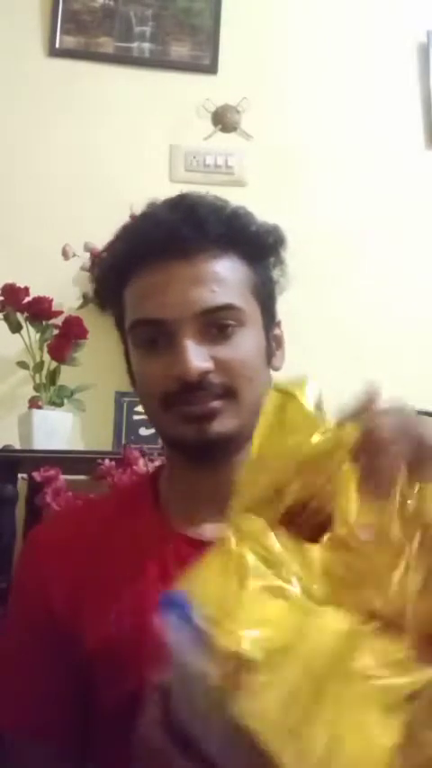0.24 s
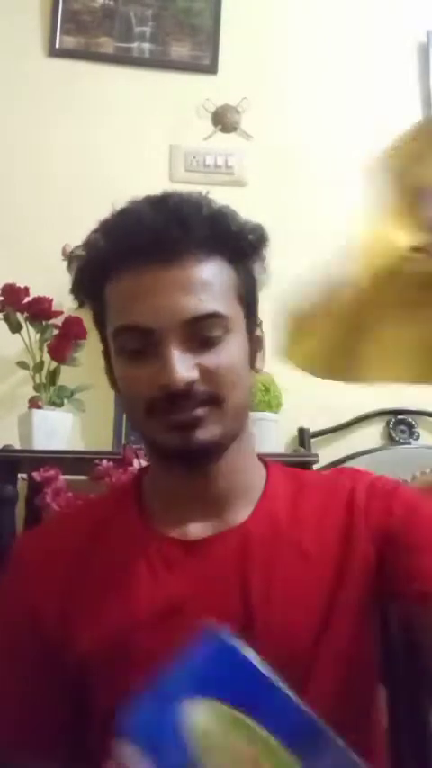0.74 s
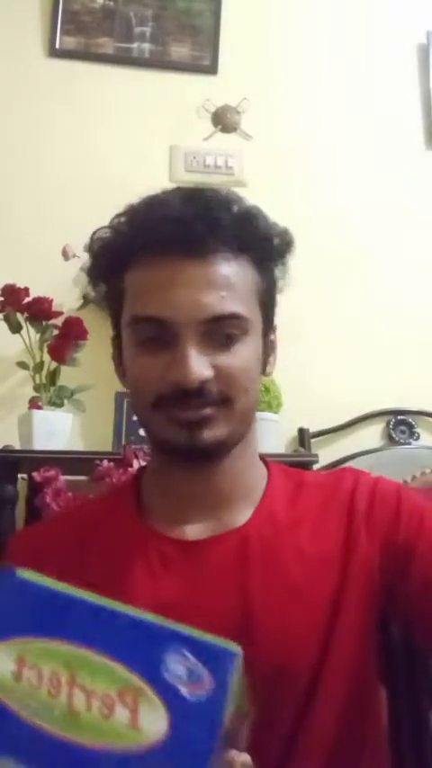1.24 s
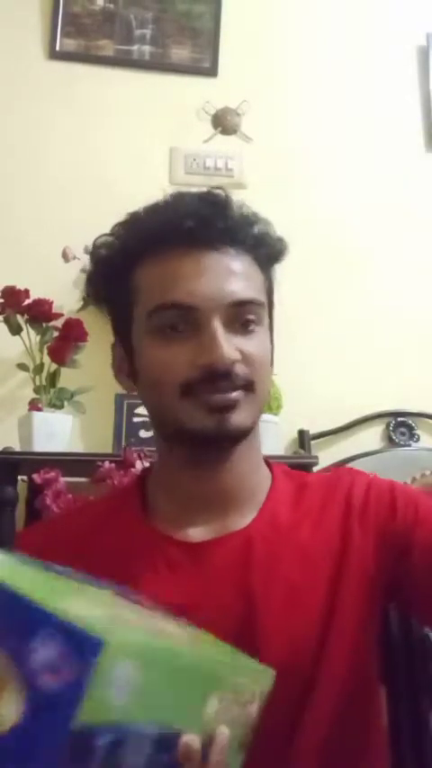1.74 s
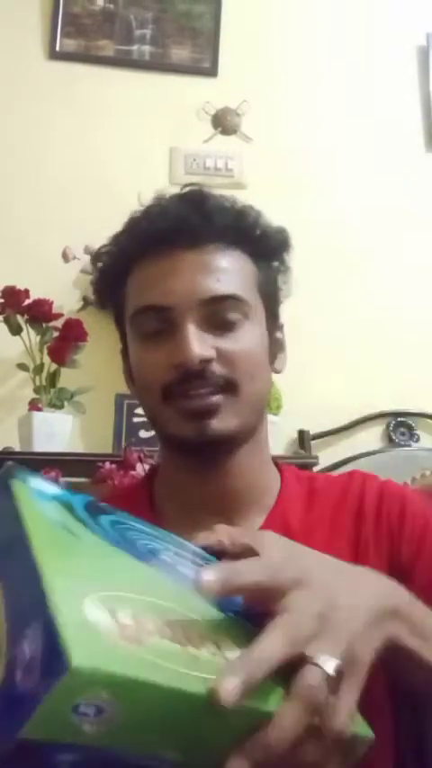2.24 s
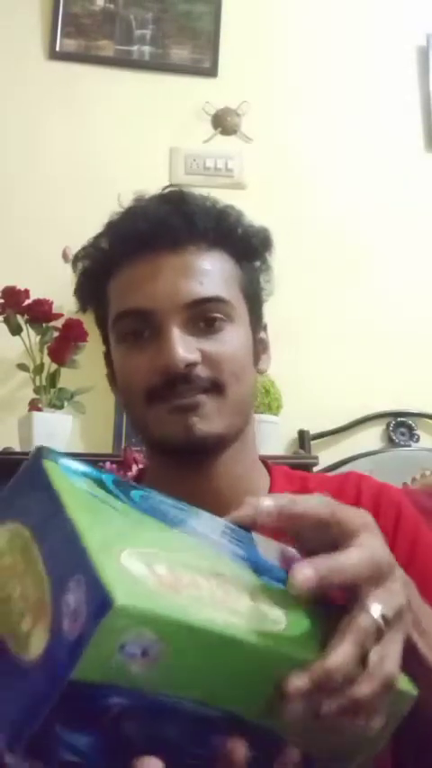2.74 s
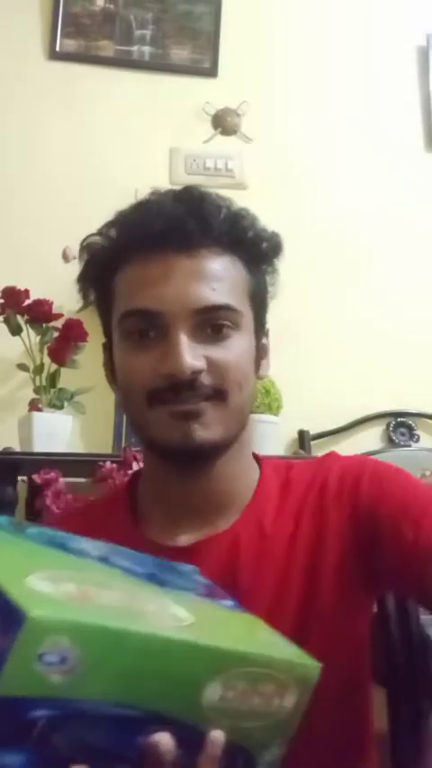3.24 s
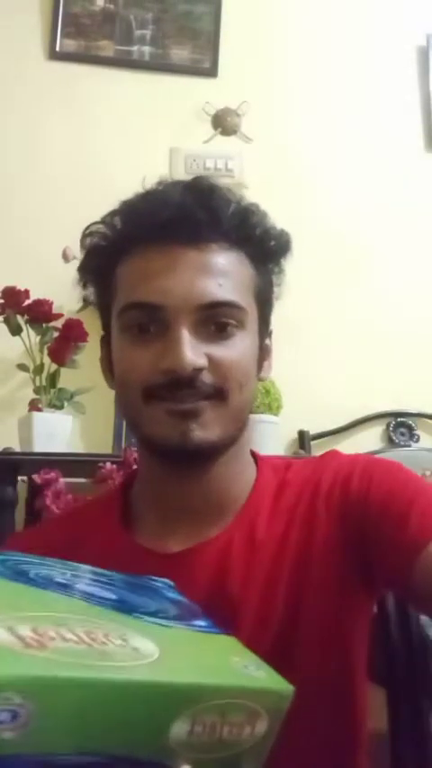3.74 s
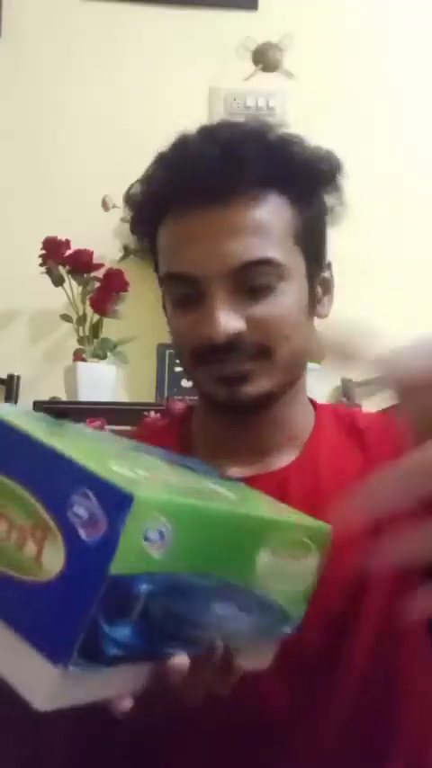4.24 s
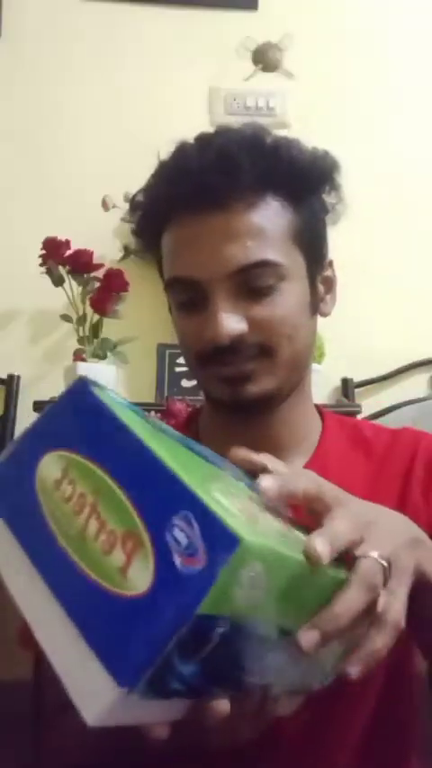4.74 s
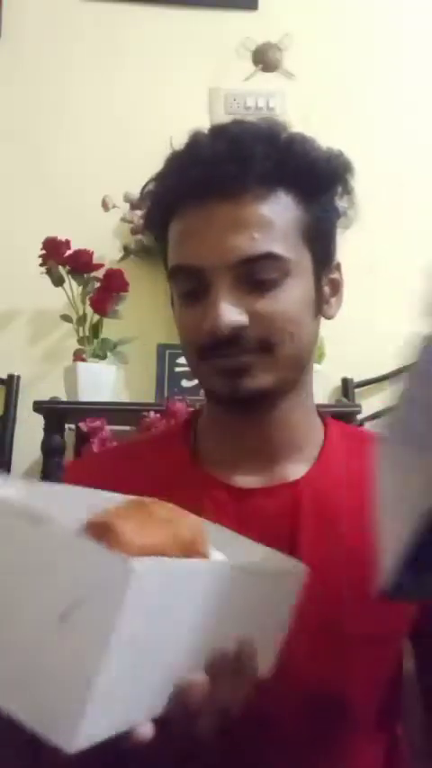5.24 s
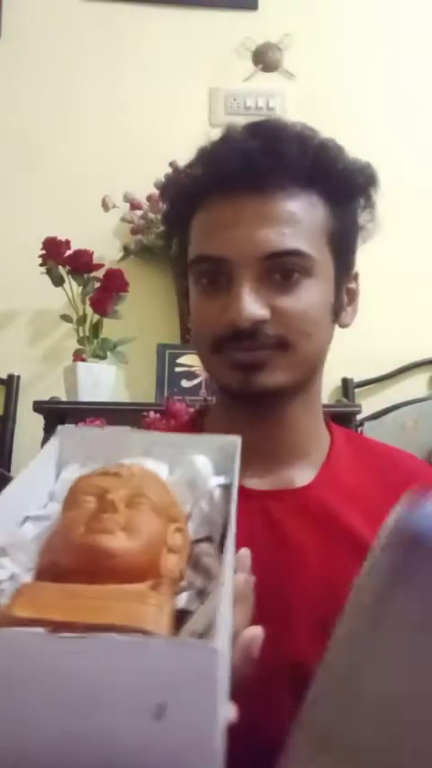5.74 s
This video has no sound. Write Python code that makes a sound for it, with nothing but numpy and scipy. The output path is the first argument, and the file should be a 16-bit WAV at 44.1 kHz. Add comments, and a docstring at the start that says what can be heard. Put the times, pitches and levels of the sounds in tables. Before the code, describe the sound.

Close, crisp foil crinkling, a sudden ringing metallic clatter, then quiet cardboard rubs and taps ending in a hollow lid scrape and pop.

```python
"""Unwrapping a box

Foil gift wrap is pulled off a cardboard box in a small bare room, close to a phone: crackles and snaps of creases.
Something hard and ringing, like a small metal dish, falls and clatters to rest as clacks and fading tones,
driving the limiter down. Fingers then turn the box, rubbing and bumping it, and its tight lid slides off with
a hollow scrape and a pop: many tiny slips pass through the resonances of the box."""
import sys
import numpy as np
from scipy import signal
from scipy.fft import rfft, irfft
from scipy.io import wavfile
from scipy.ndimage import uniform_filter1d, minimum_filter1d

SR = 44100
rng = np.random.default_rng(int(sys.argv[2]) if len(sys.argv) > 2 else 0)


def store_pcm(level_fs):
    """Save levels as 16-bit WAV."""
    pcm = np.round(np.clip(level_fs, -1, 1) * 32767).astype(np.int16)
    wavfile.write(sys.argv[1], SR, np.atleast_2d(pcm).T)


N = 264159
TIME = np.arange(N) / SR


def from_db(db):
    """Decibels to gain."""
    return 10 ** (np.asarray(db) / 20)


def at_hz(points, hz):
    """Read a table on a log-frequency axis."""
    knots, values = np.transpose(points)
    return np.interp(np.log(np.maximum(hz, 1)), np.log(knots), values)


def dying(t60, size=8192):
    """An envelope that loses 60 dB in t60 seconds."""
    return np.exp(-np.log(1000) * np.arange(size) / (SR * t60))


def convolve(x, response):
    """Let each sample set off the response, keeping the same length."""
    return signal.fftconvolve(x, response)[:len(x)]


def cut(x, order, hz, kind="low"):
    """Keep what lies below, above or between the given frequencies."""
    return signal.sosfilt(signal.butter(order, hz, kind, fs=SR, output="sos"), x)


def colour(x, spectrum, size=4096):
    """Shape the tone by a table, with a minimum-phase filter so that nothing sounds early."""
    gain = from_db(at_hz(spectrum, np.arange(size // 2 + 1) * SR / size))
    cepstrum = irfft(np.log(gain))
    cepstrum[1:size // 2] *= 2
    cepstrum[size // 2 + 1:] = 0
    return convolve(x, irfft(np.exp(rfft(cepstrum))))


def resonance(hz, r):
    """Filter coefficients of one resonance with gain 1 on top."""
    return np.array([1, 0, -1]) * (1 - r * r) / 2, [1, -2 * r * np.cos(2 * np.pi * hz / SR), r * r]


def resonate(x, hz, width_hz):
    """Sound one fixed resonance."""
    return signal.lfilter(*resonance(hz, np.exp(-np.pi * width_hz / SR)), x)


def glide(x, hz, width_hz, size=128):
    """A resonance whose centre moves."""
    r = np.exp(-np.pi * width_hz / SR)
    out, state = np.zeros(N), np.zeros(2)
    for i in range(0, N, size):
        out[i:i + size], state = signal.lfilter(*resonance(hz[i], r), x[i:i + size], zi=state)
    return out


def even(x, size=3000):
    """Hold the running rms at 1, keeping the fine grain."""
    return x / np.sqrt(np.abs(uniform_filter1d(x * x, size)) + 1e-12)


def wander(hz):
    """A smooth random drift with spread 1."""
    return even(cut(rng.standard_normal(N), 2, hz), size=SR // 2)


def add(out, s, sound, peak_db):
    """Place a sound at a time, with a given peak."""
    i = max(round(s * SR), 0)
    scaled = from_db(peak_db) * sound / np.abs(sound).max()
    out[i:i + len(sound)] += scaled[:N - i]


def stroke(start, length, db, rise_db_per_s, fall_db_per_s):
    """Gain of one movement: it swells, holds and dies away."""
    t = TIME[::32]
    early, late = np.maximum(start - t, 0), np.maximum(t - start - length, 0)
    loss_db = rise_db_per_s * early + fall_db_per_s * late
    return np.interp(TIME, t, from_db(db - np.minimum(loss_db, 200)))


def strokes(rows, rise_db_per_s, fall_db_per_s, count):
    """One gain for each level column over a series of movements, added in power."""
    rows = np.array(rows)
    shapes = [stroke(start, length, 0, rise_db_per_s, fall_db_per_s) for start, length in rows[:, :2]]
    return np.sqrt(from_db(rows[:, 2:2 + count].T) ** 2 @ np.array(shapes) ** 2)


def grains(per_s, spread_db, t60, cap, count=24, size=512):
    """Random tiny releases on many facets, each with its own short ring.

    A positive spread makes a few releases strong, a negative one a few weak."""
    strength = from_db(spread_db * np.minimum(rng.exponential(1, N), cap))   # the cap limits the unevenness
    clicks = strength * rng.choice([-1, 1], N) * (rng.random(N) < per_s / SR)
    facet = rng.integers(0, count, N)
    rings = rng.standard_normal((count, size)) * dying(t60, size=size)
    out = np.zeros(N)
    for k, ring in enumerate(rings):
        out += signal.oaconvolve(clicks * (facet == k), ring / np.linalg.norm(ring))[:N]
    return out


def snaps(rows, width_hz, edge_db, shiver_db, shiver_t60, delay_s):
    """Each snap is one sharp push and a brief shiver, through a broad resonance, with a bright edge."""
    out = np.zeros(N)
    for s, peak_db, hz in rows:
        push = from_db(shiver_db) * dying(shiver_t60) * rng.standard_normal(len(dying(1)))
        push[0] = 1
        edge = from_db(edge_db) * np.diff(push, prepend=0)
        add(out, s + delay_s, resonate(push, hz, width_hz) + edge, peak_db)
    return out


# how long the room's echo takes to fade by 60 dB: (frequency [Hz], time [s])
ROOM_FADE = [(80, 0.95), (300, 0.67), (1000, .52), (3000, 0.41), (12000, 0.39)]


def room_tail(count=10):
    """Diffuse echo of the room, built in bands about an octave wide, the bass lasting longest; energy 1."""
    tail = np.zeros(SR)
    for hz in np.geomspace(50, 14000, count):
        band = cut(rng.standard_normal(SR), 2, [hz / np.sqrt(2), hz * np.sqrt(2)], "band")
        tail += band * dying(at_hz(ROOM_FADE, hz), size=SR)
    tail *= np.minimum(TIME[:SR] / 0.016, 1)   # the echo swells in over 16 ms
    return tail / np.sqrt(np.sum(tail ** 2))


# tone of the quiet background: (frequency [Hz], level [dB])
HUSH_TONE = [(30, -9), (140, -4.5), (300, -5.5), (1000, -15), (3000, -2), (6000, -15.5), (15000, -17)]


def hush():
    """Steady, quiet noise lies under everything."""
    return from_db(-65) * even(colour(rng.standard_normal(N), HUSH_TONE))


FOIL_GONE_S = 1.58   # the sheet is let go
SMALL_SNAPS_PER_S, SMALL_SNAP_HZ = 12, 3000   # pitch strays up to half an octave either way
SMALL_SNAP_DB, SMALL_SNAP_SPREAD_DB = 9.5, 3   # height above the pull's crackle level, and spread either way


def small_snaps(crackle):
    """Lesser creases let go at random moments, stronger the harder the foil is pulled."""
    when, size, pitch = rng.random((round(SMALL_SNAPS_PER_S * FOIL_GONE_S), 3)).T
    s = when * FOIL_GONE_S
    crackle_db = 20 * np.log10(np.interp(s, TIME, crackle))
    peak_db = crackle_db + SMALL_SNAP_DB + SMALL_SNAP_SPREAD_DB * (2 * size - 1)
    return np.transpose([s, peak_db, SMALL_SNAP_HZ * 2 ** (pitch - .5)])


# pulls on the foil:
# (start [s], length [s], relative crackle level [dB], relative level of the whole sheet flapping [dB])
FOIL_PULLS = [(0.0, 0.1, -26.5, -37.5), (0.17, 0.12, -23, -31.5), (0.615, .025, -38, -46.5),
              (0.795, 0.1, -28, -38), (0.895, 0.14, -28, -35.5), (1.15, 0.018, -39, -59),
              (1.295, .03, -27.5, -40.5), (1.46, 0.11, -31.5, -40)]
# loud single creases snapping: (time [s], relative peak level [dB], pitch [Hz])
FOIL_SNAPS = [(0.0834, -11.5, 3500), (0.151, -11, 3145), (0.1629, -9, 1320), (0.1947, -6.5, 3020),
              (0.2162, -21, 2500), (0.2244, -4.5, 2600), (0.2299, -3.5, 3320), (0.2429, -25, 2520),
              (0.2763, -1, 2760), (0.346, -12.5, 2310), (0.5296, -16, 2250), (0.5924, -14.5, 3040),
              (0.783, -10, 3807), (0.8389, -15, 2190), (0.885, -16, 3220), (0.8954, -15, 2477),
              (0.9487, -9.5, 3457), (0.9674, -12.5, 3310), (1.0515, -14.5, 3700), (1.1446, -19.5, 1432),
              (1.1728, -17, 1922), (1.247, -22, 1550), (1.279, -15, 3430), (1.3168, -8.5, 2310),
              (1.4296, -17, 3840)]
# tone of the crackling creases: (frequency [Hz], level [dB])
CRACKLE_TONE = [(400, -31), (900, -19.5), (1400, -3.5), (2000, 0.5), (2700, 4), (4000, 4), (6000, -0.5),
                (15000, -0.5)]
# tone of the flapping sheet: (frequency [Hz], level [dB])
FLAP_TONE = [(40, -18.5), (80, -4), (160, -1), (400, 0.5), (750, 1.5), (1200, 1.5), (2500, -19.5),
             (7000, -47.5)]
PULL_SPEED = dict(rise_db_per_s=247, fall_db_per_s=118.5)
RUSTLE_DB, RUSTLE_FLAP_DB = -35, -47.5   # on the scale of the pulls: it rustles on until it is let go


def foil(room):
    """Creases buckle by the thousand, in little avalanches; each also shakes the wider sheet."""
    crackle, flap = strokes(FOIL_PULLS, **PULL_SPEED, count=2)
    held = stroke(0, FOIL_GONE_S, 0, **PULL_SPEED)
    crackle = np.hypot(crackle, from_db(RUSTLE_DB) * held)
    flap = np.hypot(flap, from_db(RUSTLE_FLAP_DB) * held)
    avalanche = wander(hz=58.9)
    # mostly weak, a few strong: a facet stores only so much energy
    creases = grains(per_s=2400 * from_db(4 * avalanche), spread_db=3.5, t60=.0035, cap=3.0)
    creases = creases + from_db(-8) * convolve(creases, room)
    sheet = from_db(5.5) * crackle * even(colour(creases, CRACKLE_TONE))
    sheet += from_db(2.33) * flap * even(colour(creases, FLAP_TONE))
    loud = from_db(5) * snaps([*FOIL_SNAPS, *small_snaps(crackle)], width_hz=1200, edge_db=-22.5,
                              shiver_db=-15.5, shiver_t60=0.011, delay_s=.0009)
    return sheet + loud + from_db(-12) * convolve(loud, room)


# needle-sharp crackles of foil and glossy card: (time [s], relative level [dB])
SHARP_CRACKLES = [(0.157, -19.5), (0.1944, -19.5), (0.5, -26), (0.8026, -26), (0.832, -24.5), (1.1567, -26),
                  (2.3235, -51), (2.4952, -56), (2.608, -45.5), (2.8795, -49), (3.245, -34.5), (3.446, -45),
                  (3.661, -47), (5.505, -53)]


def prickles():
    """The smallest creases let go almost at once, with nearly all their energy in the treble."""
    out = np.zeros(N)
    for s, peak_db in SHARP_CRACKLES:
        add(out, s + 0.00105, rng.standard_normal(len(dying(1))) * dying(0.0075), peak_db)
    return from_db(24.5) * cut(out, 2, 6500, "high")


# soft bumps on the box, the loudest as the lid comes free:
# (time [s], peak level [dB], pitch [Hz], time to fade by 60 dB [s], level of the upper panel modes [dB])
BOX_BUMPS = [(0.194, -26, 121, 0.051, -8), (0.948, -27, 120, 0.063, -7.5), (1.085, -32, 89.5, 0.18, -19),
             (1.159, -43, 63, 0.092, 0), (2.2, -31.5, 310, 0.033, -1.5), (2.898, -31, 171, 0.046, 2),
             (3.622, -35.5, 160, 0.12, 1), (3.768, -26, 180, 0.02, 4), (4.059, -41, 237.4, 0.45, -28),
             (4.435, -33.5, 138, 0.11, 3), (4.9346, -7.5, 440, 0.031, -1), (4.9347, -17, 1350, 0.02, -12),
             (5.449, -44, 191, 0.05, -12), (5.65, -35, 202, 0.03, 5), (5.746, -30.5, 157, 0.11, 11),
             (5.941, -33, 214, 0.057, 17)]
# modes, or natural tones, of a pressed cardboard panel: (multiple of the lowest pitch [ratio], level [dB])
PANEL_MODES = [(1, 16), (1.451, -5), (2.302, 0), (3.121, 1.5), (4.7, -9)]
# fingertips and nails ticking on the box, and at 4.933 s the sharp click of the lid popping off:
# (time [s], relative peak level [dB], pitch [Hz])
BOX_TICKS = [(2.202, -29.5, 2760), (2.6075, -30.5, 3860), (2.628, -35, 2540), (2.7805, -45.5, 2140),
             (2.8739, -41, 1386), (2.8985, -34, 895), (3.158, -28, 4120), (3.3635, -34, 1810),
             (3.4452, -30, 3730), (3.5365, -26, 2040), (3.6617, -33, 1900), (3.7443, -32.5, 1970),
             (3.7665, -20.5, 1940), (4.9334, -13, 1300), (5.3073, -33.5, 1173), (5.7458, -29, 1040),
             (5.8272, -35.5, 2650), (5.9364, -37, 1260)]


def touches(room):
    """Nails tick on the box, the lid clicks, and bumps sound the panels, whose higher modes die sooner."""
    out = from_db(3.5) * snaps(BOX_TICKS, width_hz=900, edge_db=-25,
                               shiver_db=-18.5, shiver_t60=0.017, delay_s=0.00109)
    t = TIME[:SR // 2]
    for s, peak_db, hz, t60, upper_db in BOX_BUMPS:
        panel = np.zeros(len(t))
        for k, db in PANEL_MODES:
            tone = np.sin(2 * np.pi * hz * k * t) * dying(t60 / np.sqrt(k), size=len(t))
            panel += from_db(db + upper_db * (k > 1)) * tone
        radiated = cut(panel, 1, hz / 3, "high")   # a small panel radiates little bass
        add(out, s, radiated, peak_db)
    return out + from_db(-10.5) * convolve(out, room)


# bounces of the dish: (time [s], clack peak level [dB], clack pitch [Hz], opening ring rms level [dB],
# pitch of the modes that this contact favours [Hz])
DISH_BOUNCES = [(1.603, 12.5, 3000, -11.5, 594), (1.666, 3, 3516, -16, 850),
                (1.693, -2.5, 3500, -20.5, 867), (1.710, -11.5, 3400, -21, 2920),
                (1.7895, -5.5, 2200, -24.5, 2200), (1.848, 10.5, 3400, -6.5, 2316),
                (1.855, 13, 1900, 1, 1347), (1.884, 15, 3500, -13.5, 1630), (1.9425, 0.5, 1500, -18, 1550),
                (1.960, 1, 2700, -13, 2300), (1.981, -3, 2400, -33, 897), (1.996, -9, 2800, -25, 558),
                (2.020, 0.5, 3000, -20, 2400), (2.032, -8, 3100, -25, 650)]
# modes of the dish: (frequency [Hz], level [dB], undisturbed time to fade by 60 dB [s])
DISH_MODES = [(522, -1, .42), (799, -5, .34), (888, -1, .38), (1171, -9, .15), (1249, -5, .17),
              (1470, -11, .13), (1571, -2, .42), (1700, -10, .2), (1909, -11, .22), (2237, -7, .16),
              (2268, -7, .2), (2310, -5, .14), (2398, -7, .2), (2450, -7, .2), (2640, -11, .17),
              (2846, -5, .2), (3134, -9, .15), (3201, -8, .15), (3278, -8, .15), (3487, -8, .22),
              (3570, -11, .2), (3817, -9, .15), (5150, -8, .1), (6450, -8, .12), (7150, -8, .06),
              (7700, -10, .06), (9350, -9, .06), (13600, -4, .06)]
# low tone of a struck surface, also used for the panels of the box: (frequency [Hz], level [dB])
BOOM_TONE = [(40, -15.5), (80, -10), (130, -5), (230, -2.5), (330, -12), (700, -27.5)]
DISH_REST_S = 2.054


def dish(room):
    """Every bounce checks the old ring, clacks and rings the modes anew, most those near the one it favours."""
    clacks, rings = np.zeros(N), np.zeros(N)
    hz, mode_db, t60 = np.transpose(DISH_MODES)
    t = TIME[:SR // 2]
    decays = np.array([dying(each, size=len(t)) for each in t60])
    for s, clack_db, clack_hz, ring_db, favoured_hz in DISH_BOUNCES:
        # the rim buzzes on the surface
        chatter = rng.standard_normal(len(dying(1))) * dying(0.031) * (1 - dying(0.018))
        rim = resonate(resonate(chatter, clack_hz, 1400), clack_hz, 1400)
        rim += from_db(-25.0) * resonate(chatter, 2 * clack_hz, 700)
        add(clacks, s, rim + from_db(-12.0) * chatter, clack_db)

        rings *= from_db(-1.5 * np.clip((TIME - s) / .003, 0, 1))   # the contact damps what still rings
        nearness = np.exp(-(np.log2(hz / favoured_hz) / .3) ** 2)
        strength = from_db(mode_db + 9.2 * nearness + rng.uniform(-2.8, 2.3, len(hz)))
        strength *= rng.choice([-1, 1], len(hz))
        loaded_hz = hz * (1 + rng.uniform(-.008, .008, len(hz)))   # each contact detunes the shell a little
        ring = strength @ (np.sin(2 * np.pi * loaded_hz[:, None] * t) * decays)
        crest_db = 20 * np.log10(np.abs(ring).max() / ring[:SR // 100].std())   # peak over opening rms
        add(rings, s, ring, ring_db + crest_db)
    wobble = even(cut(rng.standard_normal(N), 2, 70))
    rings *= 1 + .25 * wobble   # the tumbling dish turns its faces to and fro
    rings *= from_db(-450 * np.maximum(TIME - DISH_REST_S, 0))   # lying flat damps the ring
    thud = colour(clacks, BOOM_TONE)   # the surface it lands on, heard through the room
    thud = thud + from_db(8.0) * resonate(thud, 190, 4.6) + from_db(8.0) * resonate(thud, 335, 13)
    into_room = from_db(-12.0) * clacks + from_db(-20) * rings + from_db(-7.0) * thud
    return clacks + rings + convolve(into_room, room)


# finger rubs; the first row is the dish's clatter dying away in the room, and the one at 5.27 s is
# the lid's scrape lingering on after its last tug: (start [s], length [s], relative surface scrape level [dB],
# relative level of the hollow [dB], relative level of the panel boom [dB], pitch of the hollow [Hz])
RUBS_AND_TAILS = [(2.143, 0.12, -59, -52, -54, 320), (2.325, 0.12, -54, -64.5, -69, 350),
                  (2.462, 0.062, -55, -50, -52.5, 344), (2.539, 0.063, -74, -47.5, -53.5, 325),
                  (2.672, 0.024, -63, -62.5, -62, 370), (2.903, 0.0098, -61.5, -47.5, -55.5, 390),
                  (3.003, .06, -76, -82, -72.5, 390), (3.187, 0.027, -42, -51.5, -52.5, 400),
                  (3.239, 0.019, -39, -45.5, -48.5, 407), (3.325, 0.16, -56, -69, -69.5, 427),
                  (3.524, 0.011, -52, -56, -72, 462), (3.61, 0.17, -60, -71, -57.5, 480),
                  (3.829, .015, -51.5, -51, -48.5, 487), (3.94, 0.079, -47, -50, -48.5, 524),
                  (4.034, 0.053, -55.5, -57, -45, 530), (4.33, 0.0097, -50.5, -48.5, -56, 554),
                  (4.441, 0.0077, -48, -65, -46, 560), (5.27, 0.27, -60, -64, -59.5, 524),
                  (5.706, 0.043, -52, -63, -55, 800), (5.759, 0.2, -65.5, -53.5, -50.5, 1010)]
# the tight lid gives way in tugs:
# (start [s], length [s], relative surface scrape level [dB], relative level of the box body [dB])
LID_TUGS = [(4.26, 0.095, -49, -61), (4.47, 0.25, -55.5, -45.5), (4.735, 0.22, -40.3, -29)]
# the air resonance sinks as the lid draws out and the space inside grows, then rises: (time [s], pitch [Hz])
LID_AIR = [(4.6, 555), (4.75, 520), (4.87, 468), (5.0, 422), (5.2, 517)]
# resonances of the box walls: (frequency [Hz], width [Hz], level [dB])
WALL_RESONANCES = [(310, 14.5, -0.5), (835, 130, -4), (1110, 91, -9.5), (1336, 160, 0), (2386, 51, 3),
                   (2750, 270, -4.5), (3380, 100, -7.5)]
# tone of the surface scrape: (frequency [Hz], level [dB])
SCRAPE_TONE = [(400, -18.5), (900, -4.5), (1600, -2), (2700, -0.5), (4000, 2.5), (6500, -7), (10000, 0.5),
               (15000, -5.5)]
# tone of the hollow box: (frequency [Hz], level [dB])
HOLLOW_TONE = [(120, -30), (300, 0), (500, 2), (800, -3), (1300, -5.5), (2000, -6), (4000, -16.5)]
PRESSURE_WOBBLE_DB, PRESSURE_WOBBLE_HZ = 2.5, 25   # the fingers press unevenly
RUB_SLIPS_PER_S, LID_SLIPS_PER_S = 850, 5500
RUB_EDGE_DB, RIM_EDGE_DB = 1, -5   # treble against the rubbing scrape, and against the rim's hiss
LID_BOOM_DB = -11   # against the body of the box
LID_HISS_DB, LID_HISS_HZ, LID_HISS_WIDTH_HZ = -9, 7500, 3800   # flat card on card has little top


def rubbing(room):
    """Cardboard sticks and slips under fingers and lid; slips hiss and sound the air and panels of the box."""
    pressure = from_db(PRESSURE_WOBBLE_DB * wander(PRESSURE_WOBBLE_HZ))
    rubs = strokes(RUBS_AND_TAILS, rise_db_per_s=622, fall_db_per_s=263.5, count=3)
    rub_scrape, rub_body, rub_boom = pressure * rubs
    lid_scrape, lid_body = strokes(LID_TUGS, rise_db_per_s=209, fall_db_per_s=75.5, count=2)
    scrape, hollow = np.hypot(rub_scrape, lid_scrape), np.hypot(rub_body, lid_body)
    boom = np.hypot(rub_boom, from_db(LID_BOOM_DB) * lid_body)
    # the rim hisses as it slips over the edge of the box
    rim = stroke(start=4.925, length=0.092, db=-30.5, rise_db_per_s=350, fall_db_per_s=302)
    hiss = from_db(RUB_EDGE_DB) * rub_scrape + from_db(RIM_EDGE_DB) * rim

    lid_share = (lid_scrape / scrape) ** 2
    rub_share = 1 - lid_share
    starts, *_, hollow_hz = np.transpose(RUBS_AND_TAILS)
    cavity_hz = rub_share * np.interp(TIME, starts, hollow_hz)
    cavity_hz += lid_share * np.interp(TIME, *np.transpose(LID_AIR))
    slip_rate = rub_share * RUB_SLIPS_PER_S + lid_share * LID_SLIPS_PER_S
    slips = grains(per_s=slip_rate, spread_db=3.0, t60=0.0022, cap=3.4)
    slips = slips + from_db(-4.0) * convolve(slips, room)
    slips = slips + sum(from_db(db) * resonate(slips, hz, width) for hz, width, db in WALL_RESONANCES)

    surface = even(colour(slips, SCRAPE_TONE))
    dull, edge = cut(surface, 3, 6000), cut(surface, 3, 6000, "high")
    inside = cut(colour(slips, HOLLOW_TONE), 2, 4500)
    inside = inside + from_db(4) * glide(inside, cavity_hz, 160)
    panels = cut(colour(slips, BOOM_TONE), 2, 900)
    flat_face = resonate(surface, LID_HISS_HZ, LID_HISS_WIDTH_HZ)
    flat_face = resonate(flat_face, LID_HISS_HZ, LID_HISS_WIDTH_HZ)
    lid_hiss = (from_db(LID_HISS_DB) * lid_scrape + rim) * flat_face
    outside = from_db(2.5) * (scrape * dull + hiss * edge + lid_hiss)
    return outside + from_db(0.5) * hollow * even(inside) + from_db(-0.2) * boom * even(panels)


# resonances that a dragging fingertip sets singing: (frequency [Hz], width [Hz], level [dB])
SQUEAK_RESONANCES = [(552, 21, -2), (1103, 49.7, -4), (1610, 21, 8.5), (2160, 160, -3.5), (2590, 50, -6),
                     (3060, 110, -10)]


def squeak(room):
    """A finger drags over the glossy face; its uneven slips ring a few narrow resonances."""
    level = stroke(start=3.945, length=.13, db=-50.5, rise_db_per_s=258, fall_db_per_s=602)
    slips = grains(per_s=680, spread_db=-3.0, t60=0.0015, cap=2.3, count=2)
    ringing = sum(from_db(db) * resonate(slips, hz, width) for hz, width, db in SQUEAK_RESONANCES)
    tone = level * even(ringing)
    return tone + from_db(-15) * convolve(tone, room)


def scene():
    """Most sources share one room echo; the two channels differ only in the high treble."""
    room = room_tail()
    mid = hush() + foil(room) + dish(room) + rubbing(room) + touches(room) + squeak(room) + prickles()
    scatter = rng.standard_normal(len(dying(1))) * dying(.01)
    side = cut(convolve(mid, scatter / np.linalg.norm(scatter)), 4, 7000, "high")
    return mid + from_db(-35.5) * side * np.array([[1], [-1]])


def limiter(x, ceiling_db, release_db_per_s, size=600):
    """The gain dips just ahead of a loud peak and recovers at a steady rate."""
    over = np.maximum(20 * np.log10(np.abs(x).max(axis=0) + 1e-9) - ceiling_db, 0)
    recovery = release_db_per_s * TIME
    held = np.maximum.accumulate(over + recovery) - recovery
    ahead = minimum_filter1d(-held, 2 * size, origin=-size)
    return x * from_db(uniform_filter1d(ahead, size, origin=size // 2 - 1))


# tone of the microphone: (frequency [Hz], level [dB])
MICROPHONE_TONE = [(25, -20.5), (48, -9), (64, -3), (1000, 2), (3900, -2), (4400, -8), (5100, -16.5),
                   (7000, -12.5), (8600, -24), (11000, -28), (13800, -22), (15800, -29.5)]
DROPOUT_START_S, DROPOUT_END_S = 3.774, 3.827   # the sound drops out briefly
CUTOFF_HZ = 15750


def record(dry):
    """Microphone colour, limiter, a brief dropout and the top cut."""
    x = np.array([colour(channel, MICROPHONE_TONE) for channel in dry])
    x = limiter(x, ceiling_db=-.6, release_db_per_s=100.0)
    x = x * ((TIME < DROPOUT_START_S) | (TIME > DROPOUT_END_S))
    return signal.sosfilt(signal.ellip(12, .1, 80, CUTOFF_HZ, fs=SR, output="sos"), x)


dry = scene()
out = record(dry)
store_pcm(out)
```